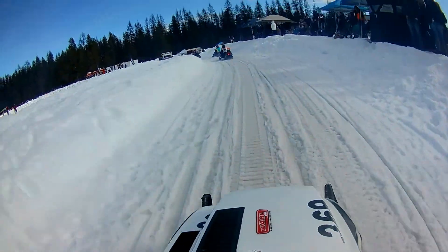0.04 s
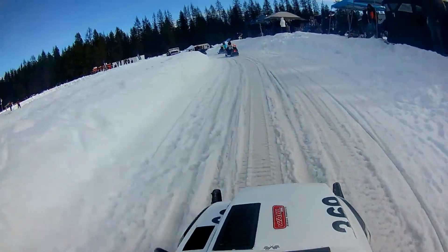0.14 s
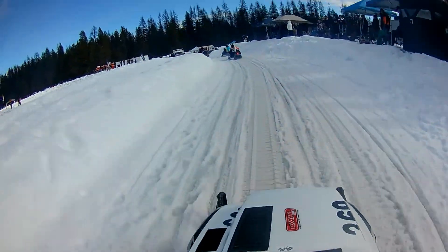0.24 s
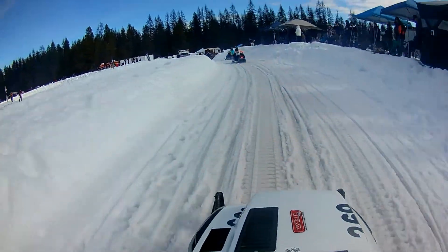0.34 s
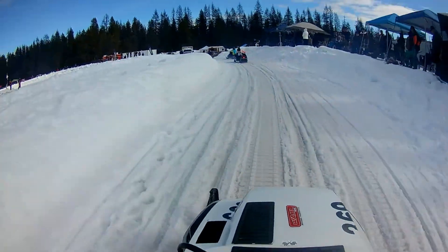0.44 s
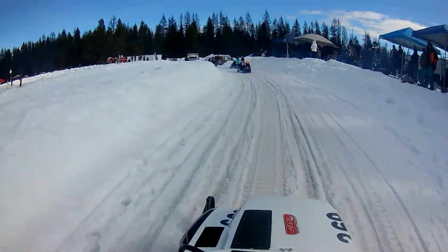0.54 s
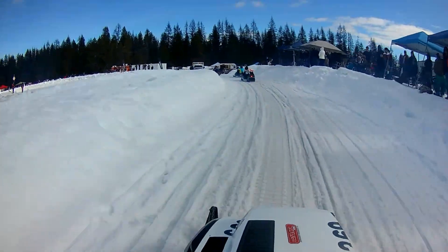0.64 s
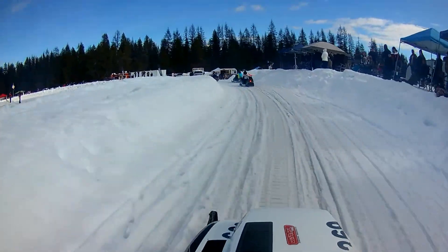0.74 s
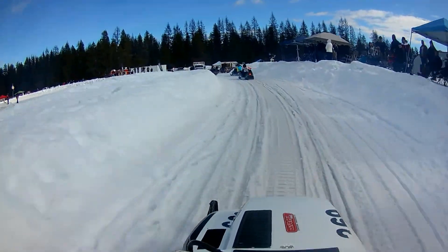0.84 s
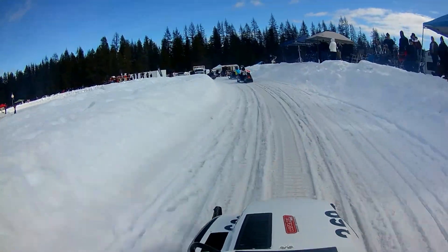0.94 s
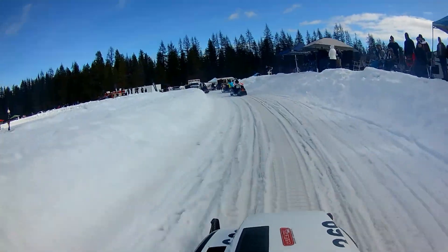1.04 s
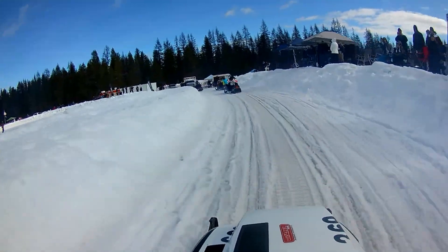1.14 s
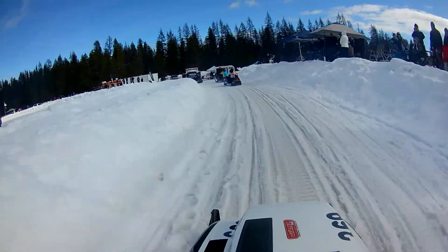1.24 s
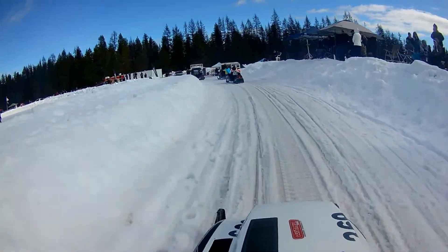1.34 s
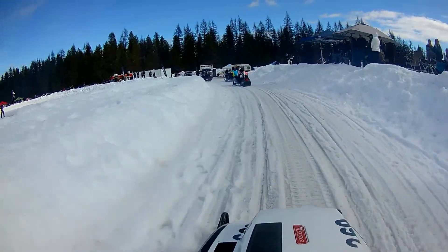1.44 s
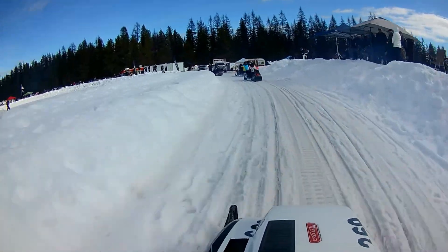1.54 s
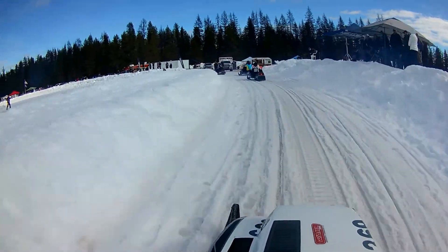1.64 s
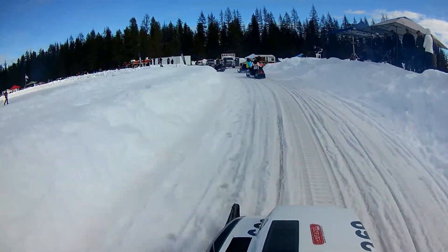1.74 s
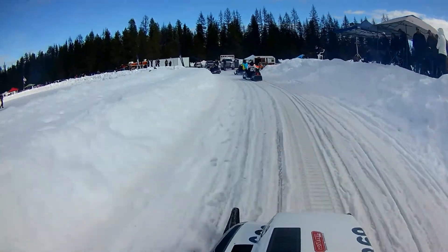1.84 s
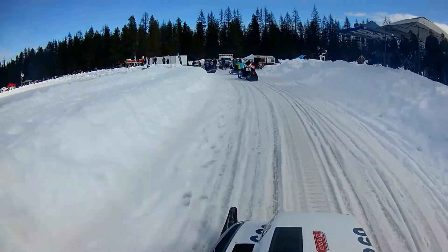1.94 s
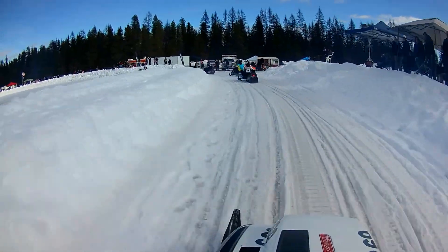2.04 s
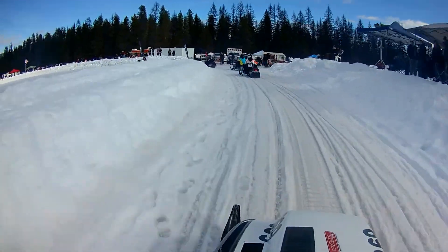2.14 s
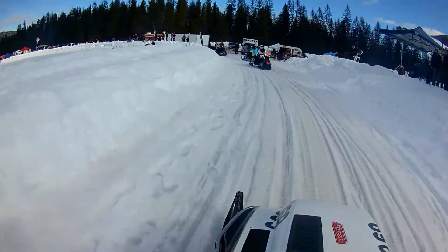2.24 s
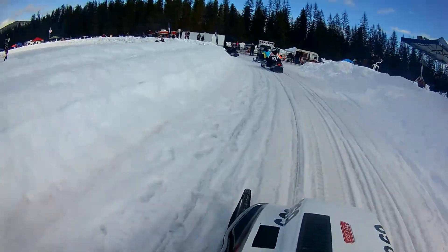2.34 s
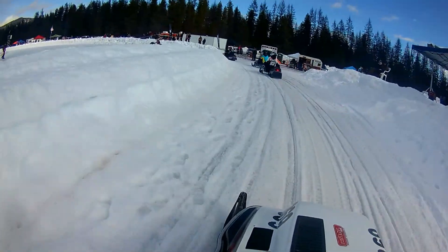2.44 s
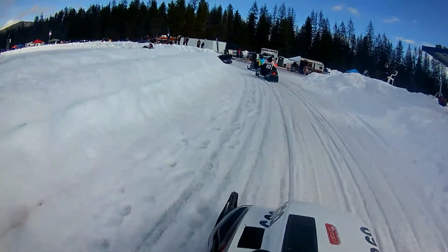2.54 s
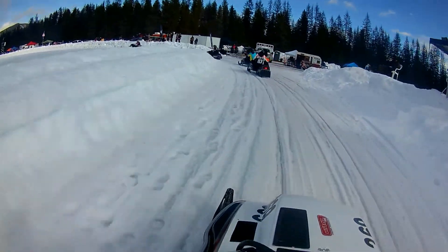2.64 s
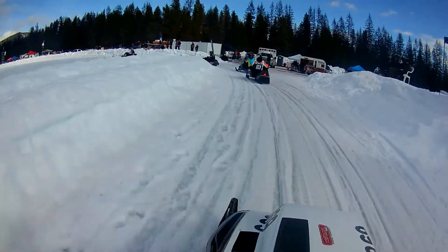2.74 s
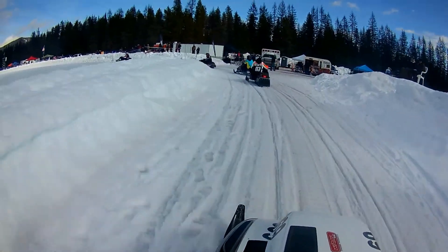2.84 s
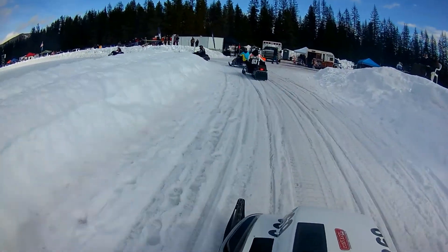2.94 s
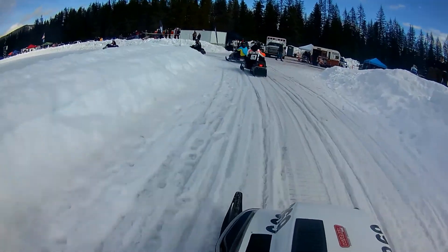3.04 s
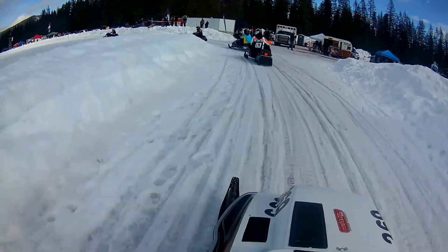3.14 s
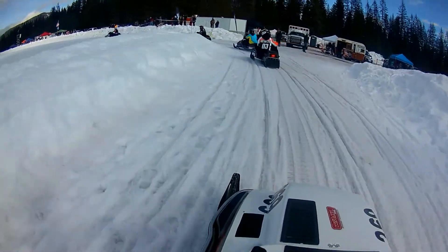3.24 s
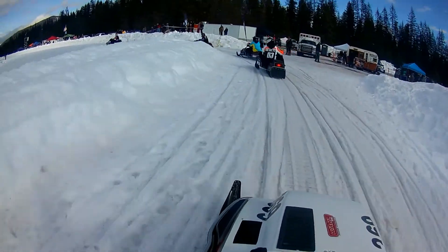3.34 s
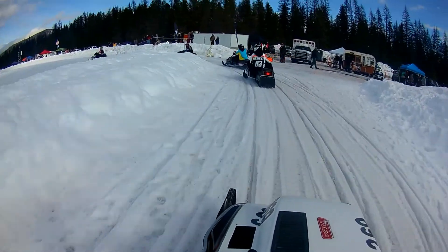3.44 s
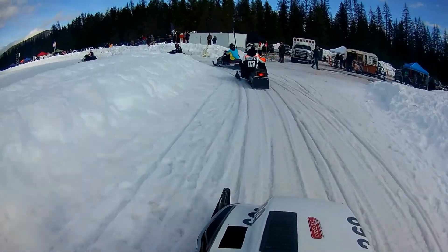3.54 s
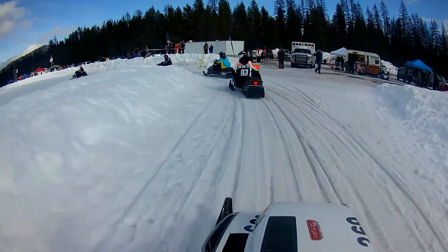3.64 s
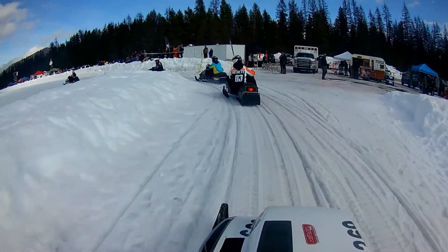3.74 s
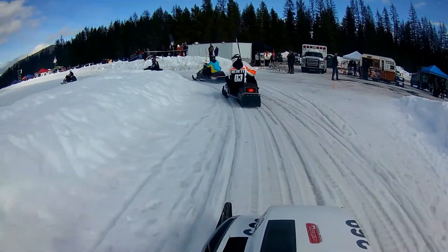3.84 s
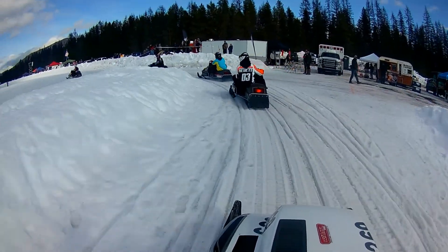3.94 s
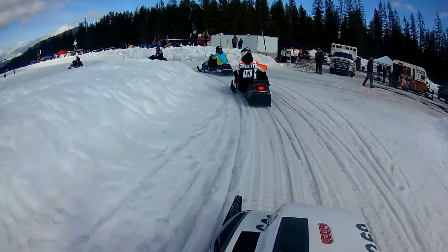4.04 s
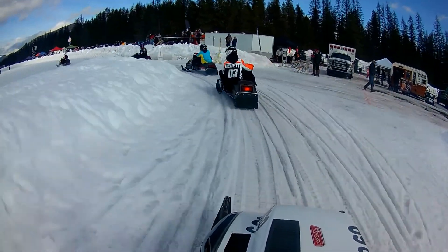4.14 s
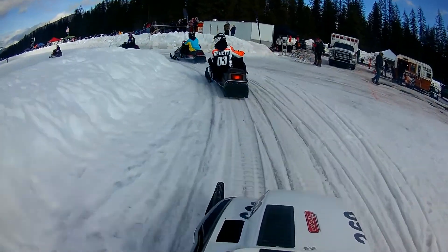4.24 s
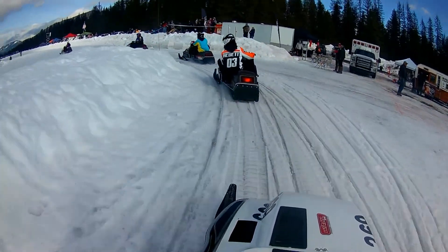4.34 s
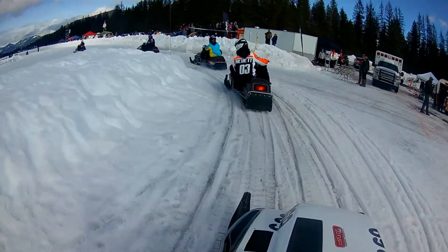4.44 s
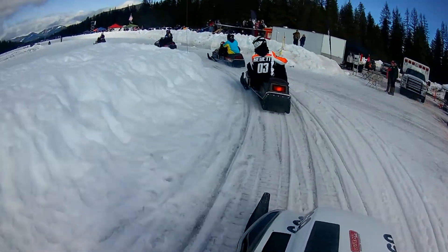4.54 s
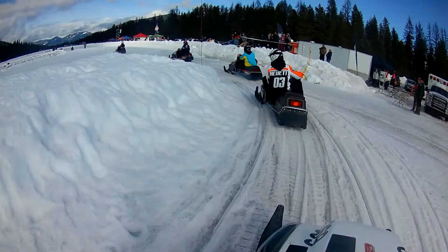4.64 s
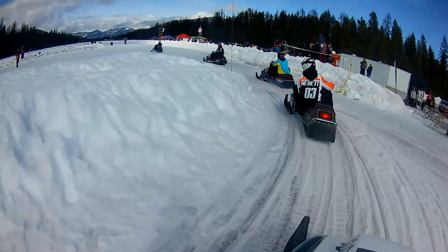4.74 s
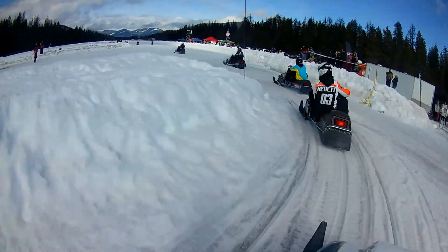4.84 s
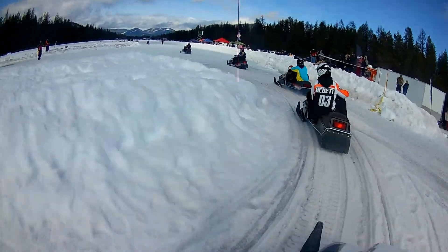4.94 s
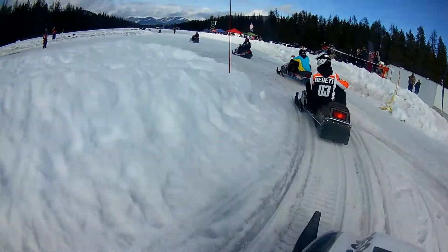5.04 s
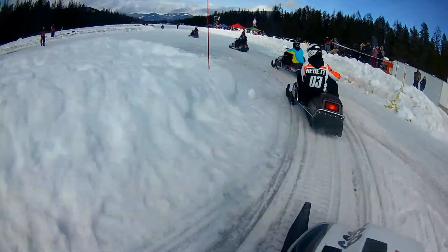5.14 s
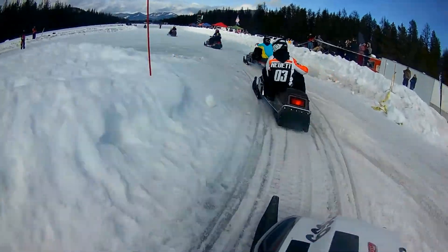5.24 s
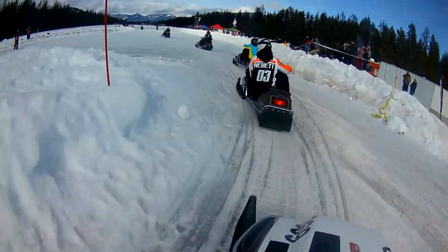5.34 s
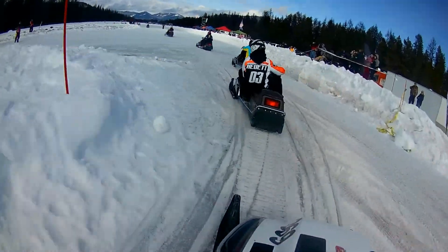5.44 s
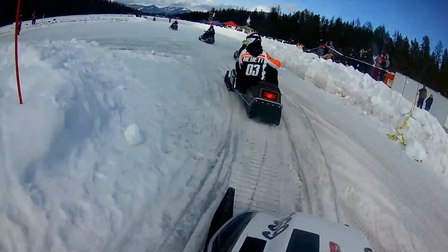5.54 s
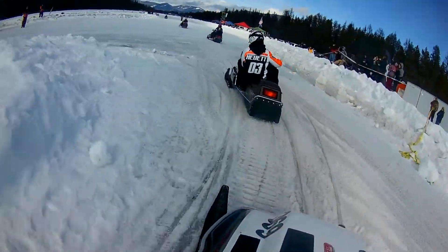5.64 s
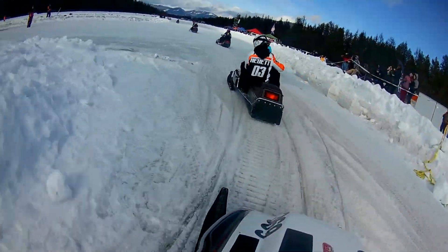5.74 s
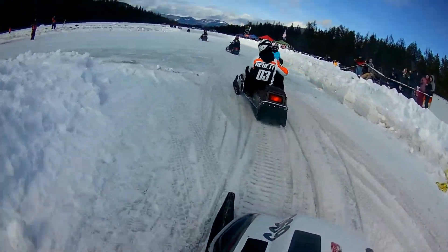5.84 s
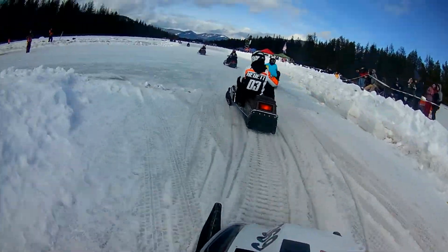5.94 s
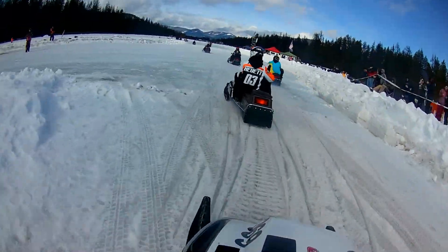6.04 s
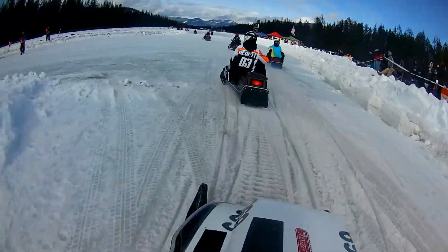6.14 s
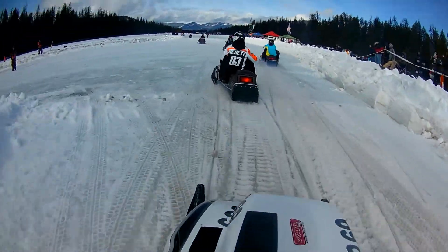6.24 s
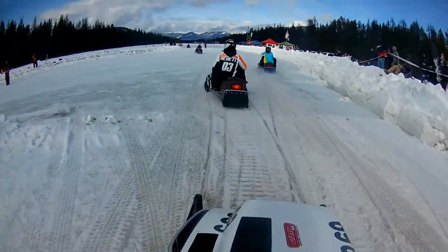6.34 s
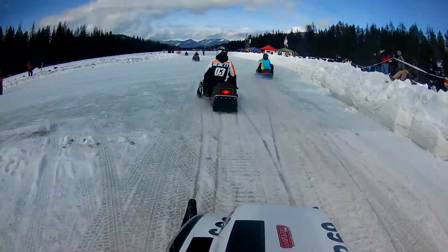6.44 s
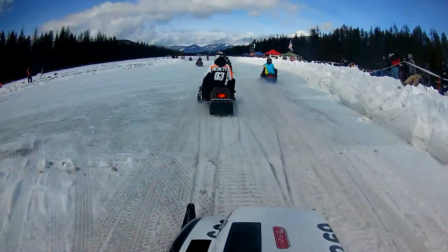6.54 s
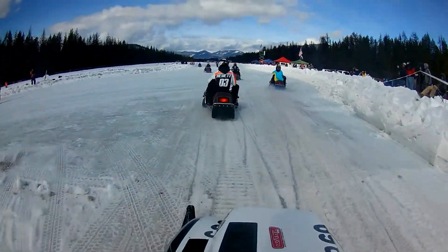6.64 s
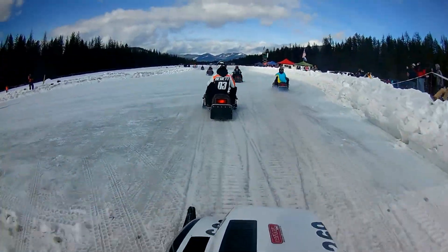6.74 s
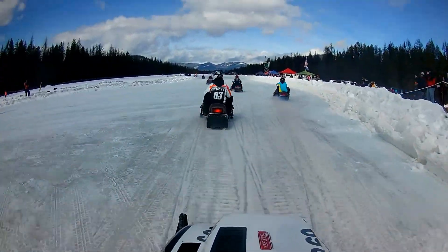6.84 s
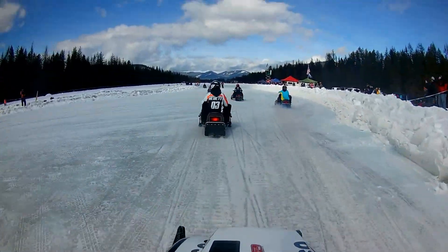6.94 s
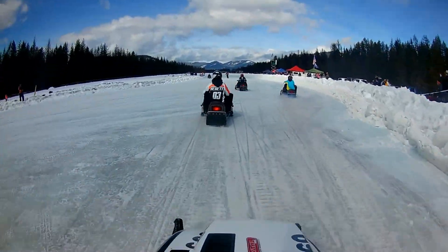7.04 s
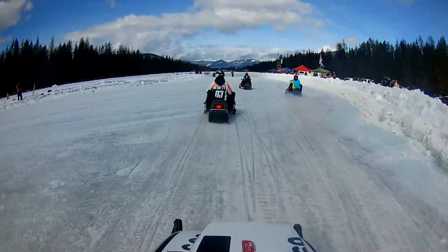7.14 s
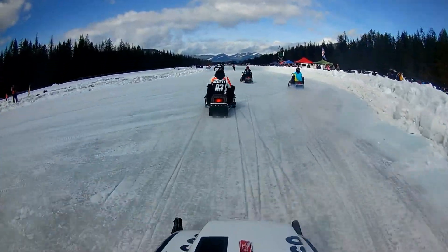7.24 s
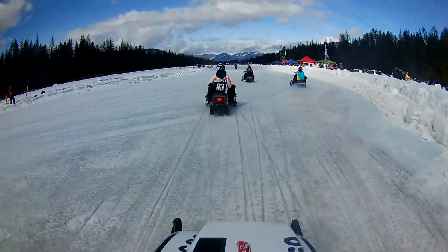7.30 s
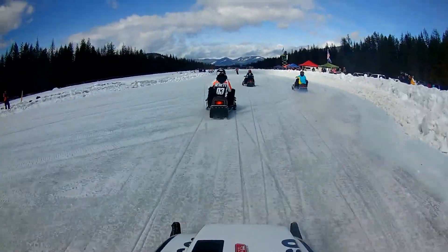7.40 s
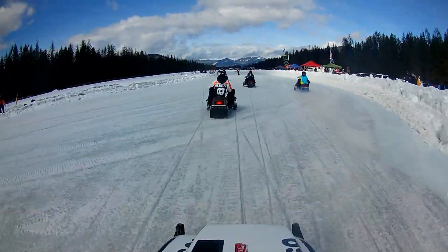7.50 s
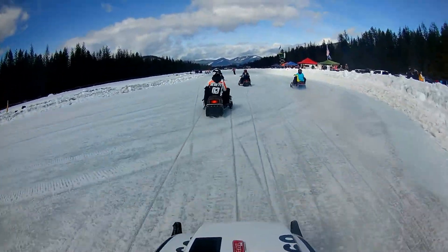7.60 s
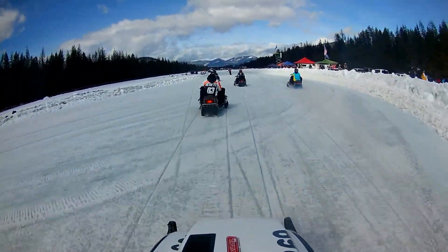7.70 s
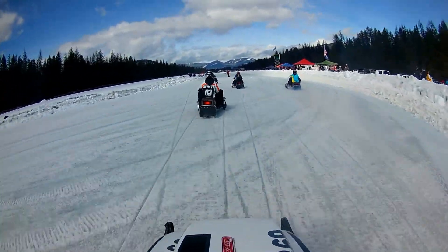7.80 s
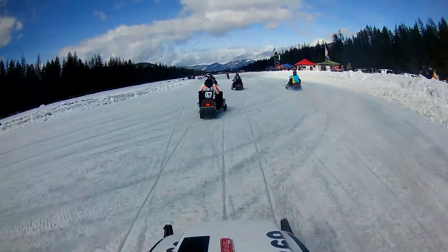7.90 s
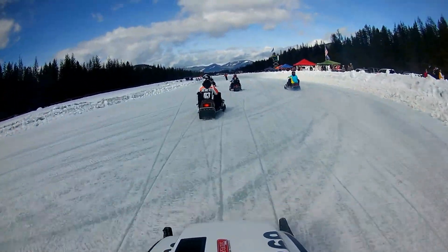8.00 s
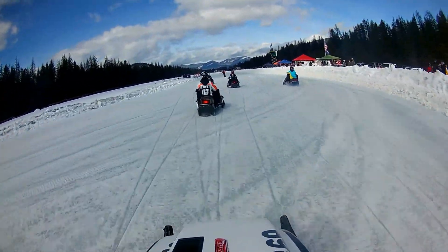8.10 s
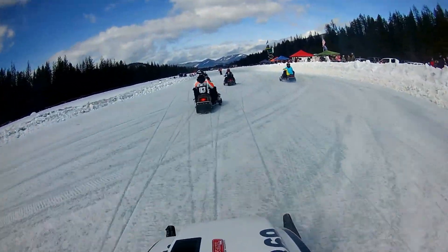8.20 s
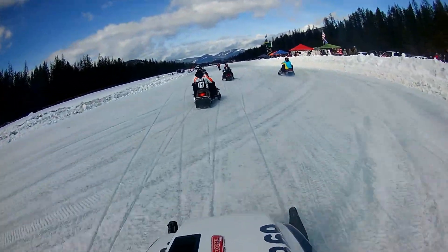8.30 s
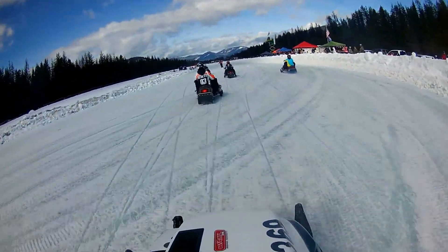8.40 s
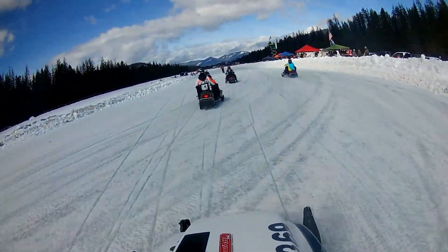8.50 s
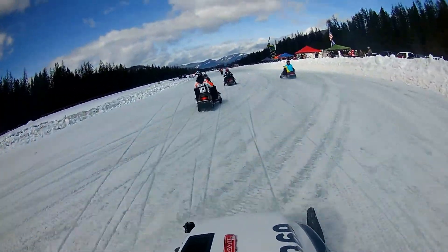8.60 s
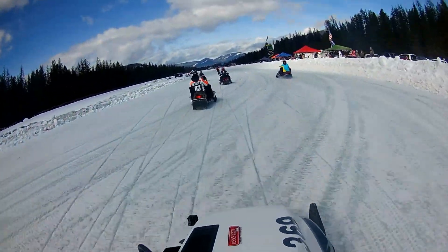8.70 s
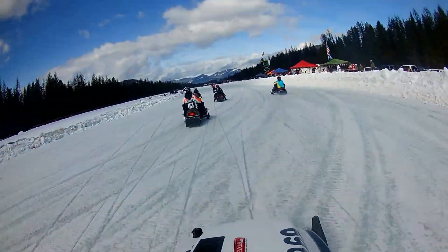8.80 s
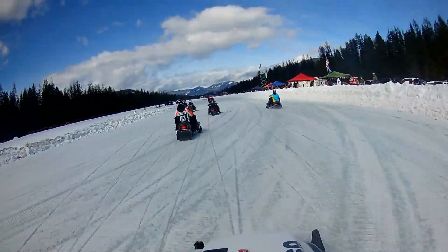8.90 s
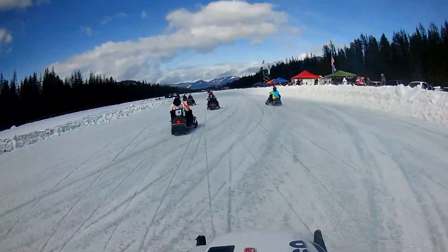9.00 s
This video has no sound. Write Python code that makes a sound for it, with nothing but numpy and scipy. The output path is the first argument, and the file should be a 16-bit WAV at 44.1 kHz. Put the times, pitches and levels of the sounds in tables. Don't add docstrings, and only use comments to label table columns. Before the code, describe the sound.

Onboard a two-stroke snowmobile: raspy engine bursts, a quieter coast through a bend, then steady cruising and a final surge, boxy and hollow.

```python
import sys
import numpy as np
from scipy import signal
from scipy.fft import rfft, irfft, next_fast_len
from scipy.io import wavfile
from scipy.ndimage import uniform_filter1d

SR = 44100
rng = np.random.default_rng(int(sys.argv[2]) if len(sys.argv) > 2 else 0)


def inscribe(sig):
    pcm = np.round(np.clip(np.atleast_2d(sig).T, -1, 1) * 32767)
    wavfile.write(sys.argv[1], SR, pcm.astype(np.int16))


def ratio_of_db(decibels):
    return 10 ** (np.asarray(decibels, float) / 20)


N = 399634
TIME = np.arange(N) / SR
FADE_S = 0.058


def evened(x):
    return x / np.sqrt(np.mean(x ** 2) + 1e-20)


def columns(rows):
    s, *values = np.transpose(rows)
    return [np.interp(TIME, s, v) for v in values]


def spectrum_db(hz, points):
    f, db = np.transpose(points)
    return np.interp(np.log(hz + 1), np.log(f + 1), db)


def resonances_db(hz, modes):
    return sum(db / (1 + (2 * (hz - centre_hz) / width_hz) ** 2) for centre_hz, width_hz, db in modes)


def colour(x, points):
    size = next_fast_len(N)
    hz = np.fft.rfftfreq(size, 1 / SR)
    return irfft(rfft(x, size) * ratio_of_db(spectrum_db(hz, points)), size)[:N]


def drift(rate_hz, count=1):
    knots_s = np.arange(0, N / SR + 1, 1 / 200)
    lowpass = signal.butter(2, min(rate_hz / 100, .95))
    smooth = signal.lfilter(*lowpass, rng.standard_normal((count, len(knots_s))))
    return [np.interp(TIME, knots_s, evened(row)) for row in smooth]


def line(turns, db, waver_db=1.0):
    level = np.sqrt(2) * ratio_of_db(db + waver_db * drift(11)[0])
    return level * np.cos(2 * np.pi * (turns + rng.random()))


# (frequency [Hz], gain [dB])
CASE_SLOPE = [(25, -45), (70, -32), (130, -19.5), (250, -19.5), (500, -18.5), (1100, 1.5), (1800, -38),
              (2300, -46.5), (4000, -25), (4900, -41), (7000, -54), (10000, -56), (13000, -71.5),
              (15700, -80)]
# (frequency [Hz], width [Hz], gain [dB])
CASE_MODES = [(94, 13, 4), (326, 143, -4.5), (457, 15, -6.5), (581, 79, -7.5), (687, 69, -6),
              (777.7, 55.7, -17), (865, 74, -18.5), (947, 48, -7), (1024, 50.5, -15), (1157, 174, -28.5),
              (1392, 49, 5.5), (1602.3, 157, 18), (1834, 68, 4), (2092.3, 590, 29), (2092, 20, 7.5),
              (2573, 88, 9), (2945, 496, 11.5), (4235, 80, -5), (4890, 220, -5), (5330, 88, 7),
              (5980, 200, 5.5), (6980, 1100, 8), (7950, 180, -26.5), (8020, 130, -15), (1624.4, 20, 3.5)]


def case(x):
    hz = np.fft.rfftfreq(8192, 1 / SR)
    db = spectrum_db(hz, CASE_SLOPE) + resonances_db(hz, CASE_MODES)
    log_gain = np.log(ratio_of_db(np.r_[db, db[-2:0:-1]]))
    taps = np.fft.ifft(np.exp(np.conj(signal.hilbert(log_gain)))).real[:4096]
    band = (hz > 2400) & (hz < 4300)
    return signal.oaconvolve(x, taps)[:N] / np.sqrt(np.mean(ratio_of_db(db) ** 2 * band))


# (time [s], crank speed aimed for [Hz], lag [s], throttle [0-1], rasp over roar [dB])
THROTTLE = [(0.0, 39.18, 0.77, 0.15, -1), (.101, 169.3, 0.73, 0.85, 11), (.284, 117, 0.054, 0.89, 8),
            (.665, 117.5, .03, .5, 3), (.765, 117, 0.0529, 0.2, 6), (.815, 58.07, 1.2, 0.48, 10.5),
            (.885, 57.99, 1.18, 0.28, 4.5), (1.715, 100.8, 1.7, 0.11, 2), (1.9, 74.64, 0.63, 0.92, 9),
            (2.01, 144.3, 0.77, 0.97, 10.5), (2.365, 110, 0.032, 0.83, 12), (2.501, 71.7, 0.24, 0.19, 0.5),
            (2.755, 52, 1.26, 0.0, -9), (4.005, 41.1, 3.2, 0.02, 2.5), (5.261, 95.85, 1.45, 0.26, 5),
            (5.725, 148.5, 2.9, 0.63, 10), (6.032, 170.1, 1.71, 0.55, 10), (6.335, 110.6, .58, 0.42, 8.5),
            (6.744, 98.1, 0.42, 0.34, 7.5), (6.926, 101.5, .22, 0.36, 8), (7.321, 100.3, .15, 0.28, 7.5),
            (7.779, 82.15, 0.67, 0.2, 3.5), (8.42, 91.48, .028, 0.92, 9), (8.526, 125.4, 0.43, 0.93, 9.5)]
START_HZ = 100
LEAD_S, ANSWER_S = 0.014, 0.061


def rider():
    s, aim_hz, lag_s, *steps = np.transpose(THROTTLE)
    begin_hz = [START_HZ]
    for k, gap_s in enumerate(np.diff(s)):
        begin_hz.append(aim_hz[k] + (begin_hz[k] - aim_hz[k]) * np.exp(-gap_s / lag_s[k]))
    k = np.maximum(np.searchsorted(s, TIME, "right") - 1, 0)
    crank_hz = aim_hz[k] + (np.array(begin_hz)[k] - aim_hz[k]) * np.exp((s[k] - TIME) / lag_s[k])
    k = np.maximum(np.searchsorted(s - LEAD_S, TIME, "right") - 1, 0)
    throttle, over_db = (uniform_filter1d(v[k], round(ANSWER_S * SR), mode="nearest") for v in steps)
    return crank_hz, throttle, over_db


# (order, level at shut throttle [dB], gain at full throttle [dB],
# loss below top speed [dB/Hz], share of the rasp [0-1])
STRONG = [(2, -45.5, 22, 0.61, 0), (4, -48.5, 19, 0.35, .1), (6, -41.5, 5.5, 0.5, 0),
          (14, -43.5, 11, 0.53, 0.96), (18, -61, 25.5, .5, 0.0), (12, -62, 14, -0.2, .6),
          (13, -58, 14, 1.5, 0.64)]
# (frequency [Hz], width [Hz], gain [dB])
FRAME = [(143, 53, 4), (265, 27, 11.5), (345, 50, 6), (631, 79, 15), (983.6, 50, 14.5), (1150, 130, -11.5),
         (1275, 31, 17.5), (1342, 46, 17), (1387, 40, 13), (1551, 68, 19), (1639, 50, 19.5), (2114, 60, 16)]
TOP_HZ, SLACK_HZ = 117, 26.7
RINGS_FULL_AT = 0.27
SLOW = slice(None, None, 8)


def clean_orders(turns, crank_hz, throttle, over_db):
    awake = np.minimum(throttle / RINGS_FULL_AT, 1)
    below_top_hz = np.minimum(TOP_HZ - crank_hz, SLACK_HZ)
    strong = 0
    for order, shut_db, open_db, loss_db_per_hz, share in STRONG:
        rings_db = awake * np.repeat(resonances_db(order * crank_hz[SLOW], FRAME), 8)[:N]
        level_db = shut_db + open_db * throttle - loss_db_per_hz * below_top_hz
        level_db = level_db + share * (over_db - 9.5) + rings_db
        strong = strong + line(order * turns, level_db)
    shake_db = -42 - 1.3 * (116 - crank_hz)
    return strong + line(turns, shake_db) + line(3 * turns, shake_db - 0.5) + line(5 * turns, shake_db - 3.5)


# (order, level [dB])
UPPER = [(7, -4), (8, -4.5), (9, -3), (10, -3), (11, -2), (12, 0), (13, -5), (15, -1.5), (16, -1), (17, -2),
         (18, -2.5), (19, -5), (20, -2), (21, -6), (22, -1.5), (23, -9), (24, -6.5), (25, -10.5),
         (26, -6.5), (27, -3.5), (28, -4.5), (29, -11), (30, -11.5), (31, -8), (32, -3.5), (34, -7),
         (36, -9.5)]
PIPE_HZ, PIPE_WIDTH_HZ = 977, 98
PIPE_SHUT_DB, PIPE_PART_DB, PIPE_OPEN_DB = 4, 15, 4.5
PIPE_ODD = 0.14
ODD_SHUT_DB, ODD_OPEN_DB = 3.5, -4
STEADIER = 0.32


def upper_orders(turns, crank_hz, throttle):
    odd_db = (ODD_SHUT_DB + (ODD_OPEN_DB - ODD_SHUT_DB) * throttle)[SLOW]
    pipe_db = np.interp(throttle, [0, .42, .9], [PIPE_SHUT_DB, PIPE_PART_DB, PIPE_OPEN_DB])[SLOW]
    waver_share = 1 - STEADIER * throttle[SLOW]
    rasp = 0
    for (order, db), waver in zip(UPPER, drift(11, count=len(UPPER))):
        odd = order % 2
        near_pipe = 1 / (1 + (2 * (order * crank_hz[SLOW] - PIPE_HZ) / PIPE_WIDTH_HZ) ** 4)
        waver_db = (1.37 + 0.096 * order) * waver_share * waver[SLOW]
        level_db = db + odd_db * odd + pipe_db * near_pipe * PIPE_ODD ** odd + waver_db
        rasp = rasp + np.repeat(ratio_of_db(level_db), 8)[:N] * np.cos(2 * np.pi * (order * turns + rng.random()))
    return rasp


RASP_DB_PER_HZ = -0.004


def engine():
    crank_hz, throttle, over_db = rider()
    turns = np.cumsum(crank_hz * (1 + .002 * drift(16.8)[0])) / SR
    over_db = over_db - RASP_DB_PER_HZ * throttle * (TOP_HZ - crank_hz - 10)
    strong = clean_orders(turns, crank_hz, throttle, over_db)
    rasp = upper_orders(turns, crank_hz, throttle)
    density = np.sqrt(.27 * crank_hz / (SR / 2))
    return strong + case(rasp * density * ratio_of_db(columns(ROAR)[0] + over_db))


# (time [s], level [dB])
ROAR = [(0.0, -30), (.06, -34), (.3, -29), (1.87, -40), (1.94, -35.5), (2.2, -31), (2.47, -29),
        (2.53, -34.5), (2.8, -37.5), (4.29, -45.5), (5.4, -45.5), (5.98, -39.5), (6.21, -36.5),
        (6.7, -35.5), (8.0, -37), (8.38, -38.5), (8.53, -33.5), (9.06, -27)]
MIDDLE_DB = -37.5
LOW_SLOPE, RING_SLOPE, TREBLE_SLOPE = -0.66, -.1, .05
RING_OPEN_DB, TREBLE_OPEN_DB = -1.5, -2.5


def roar():
    frames, hz = N // 256 + 5, np.fft.rfftfreq(1024, 1 / SR)
    a, b, patches = rng.standard_normal((frames, 513, 3)).T
    patches = evened(uniform_filter1d(uniform_filter1d(patches, 14, 0), 10, 1))
    t = np.arange(frames) * 256 / SR
    crank_hz, throttle, load_db = rider()
    throttle, load_db = np.interp(t, TIME, throttle), np.interp(t, TIME, load_db)
    louder_db = np.interp(t, *np.transpose(ROAR)) - MIDDLE_DB
    flutter_db = 1.8 * evened(uniform_filter1d(rng.standard_normal(frames), size=5))
    low = 1 / (1 + (hz / 900) ** 4)
    ring = np.exp(-((hz - 1610) / 260) ** 2)
    treble = 1 / (1 + (4600 / (hz + 1)) ** 8)
    tilt_db = np.outer(low, LOW_SLOPE * louder_db)
    tilt_db += np.outer(ring, RING_SLOPE * louder_db + RING_OPEN_DB * throttle + 1.0)
    tilt_db += np.outer(treble, TREBLE_SLOPE * louder_db + TREBLE_OPEN_DB * throttle + flutter_db)
    tilt_db -= .42 * np.maximum(load_db - 4, 0) * (1 - low[:, None])
    white = evened(signal.istft((a + 1j * b) * ratio_of_db(.8 * patches), nperseg=1024, noverlap=768)[1])
    z = signal.stft(white, nperseg=1024, noverlap=768)[2][:, :frames] * ratio_of_db(tilt_db)
    noise = signal.istft(z, nperseg=1024, noverlap=768)[1][:N]
    puffs = 1 + 0.12 * np.cos(4 * np.pi * np.cumsum(crank_hz) / SR)
    bumps_db = 0.53 * drift(38)[0]
    return case(noise * puffs * ratio_of_db(columns(ROAR)[0] + bumps_db - 2.5))


# (frequency [Hz], gain [dB])
WIND = [(15, -7.5), (30, 2), (60, 0.5), (110, 2.5), (200, -10.5), (400, -46)]
# (time [s], level over the steady wind [dB])
GUSTS = [(2.0, 6.5), (2.5, 10), (3.03, 9.5), (3.5, 6), (4.19, 8), (4.99, 5), (5.22, 7.5), (6.18, -4),
         (7.57, 6), (7.97, 10.5), (8.23, 13.5), (9.06, 5), (.5, -4)]
WIND_DB, GUST_S = -59.5, .09


def wind():
    gusts_db = sum(db * np.exp(-abs(TIME - s) / GUST_S) for s, db in GUSTS)
    level_db = WIND_DB + gusts_db + 1.2 * drift(6)[0]
    return ratio_of_db(level_db) * evened(colour(rng.standard_normal(N), WIND))


# (start [s], length [s], from [Hz], to [Hz], level [dB])
WHINES = [
    (0.63, 0.34, 495, 495, -37),
    (2.4, 0.439, 134, 154, -43.5),
    (0.54, 0.34, 149, 206, -42.5),
    (5.35, .55, 230, 450, -52),
    (1.85, 0.46, 255, 270, -45),
    (3, 0.93, 127, 99, -46.5),
    (8.72, 0.25, 478, 535, -37.5),
]
SWELL_DB = 6


def whine(start_s, length_s, from_hz, to_hz, db):
    u = np.clip((TIME - start_s) / length_s, 0, 1)
    fade = np.clip(np.minimum(u, 1 - u) * length_s / FADE_S, 0, 1)
    turns = np.cumsum(from_hz + (to_hz - from_hz) * u) / SR
    return fade * line(turns, db - SWELL_DB * (2 * u - 1) ** 2, waver_db=3.0)


def thinned(x):
    hz, _, z = signal.stft(x, SR, nperseg=1024)
    thin = (hz > 2300) & (hz < 4400)
    strong = abs(z) > np.percentile(abs(z[thin]), 82, axis=0)
    kept = (hz <= 2300)[:, None] | (thin[:, None] & strong)
    return signal.istft(z * kept, SR, nperseg=1024)[1][:N]


# (time [s], length [frames])
LOSSES = [(.705, 1), (.747, 1), (1.474, 1), (2.07, 1), (2.156, 1), (2.689, 1), (2.731, 1), (2.903, 1),
          (3.02, 2), (3.862, 1), (4.374, 1), (4.632, 1), (4.673, 1), (4.82, 1), (4.909, 1), (5.034, 1),
          (5.27, 1), (5.399, 1), (5.569, 3), (5.932, 1), (6.102, 1), (6.187, 1), (7.896, 1), (8.132, 1),
          (8.365, 1)]
FRAME_S = 1024 / 48000


def treble_losses(x):
    away = np.min([abs(TIME - s) / FRAME_S - (lost - 1) / 2 for s, lost in LOSSES], axis=0)
    kept = np.sin(np.pi / 2 * np.clip(away, 0, 1))
    return kept * x + (1 - kept) * thinned(x[0])


# (time [s], firing rate [Hz], level [dB])
RIVAL = [
    [(.95, 235.7, -46.5), (1.25, 237.8, -45), (1.55, 235.7, -47), (1.9, 232, -47.5), (2.1, 235, -43)],
    [(2.68, 256.6, -52), (2.87, 253.3, -52.5), (2.97, 249.5, -54.5), (3.1, 245, -57.5), (3.3, 233.2, -62),
     (3.85, 197.4, -64)],
    [(4.72, 190.8, -53), (4.95, 210.5, -48), (5.12, 221, -48.5), (5.45, 226.6, -44), (5.8, 221.9, -40.5),
     (6.1, 217.6, -45), (6.5, 211.6, -46), (7.1, 208.4, -50), (8.1, 210, -55.5)],
]
OCTAVE_DB = [3, 15, -15]


def rival():
    drone = 0
    for rows, octave_db in zip(RIVAL, OCTAVE_DB):
        hz, db = columns(rows)
        turns = np.cumsum(hz) / SR
        fade = np.clip(np.minimum(TIME - rows[0][0], rows[-1][0] - TIME) / FADE_S, 0, 1)
        drone = drone + fade * (line(turns, db, waver_db=0.1) + line(2 * turns, db + octave_db, waver_db=2.5))
    return drone


def scene():
    return (engine() + roar() + wind() + sum(whine(*row) for row in WHINES) + rival())[None]


def band_limit(x):
    return signal.sosfilt(signal.butter(12, 15770, fs=SR, output="sos"), x)


def record(dry):
    mixed = treble_losses(dry)
    return band_limit(mixed)


dry = scene()
out = record(dry)
inscribe(out)
```